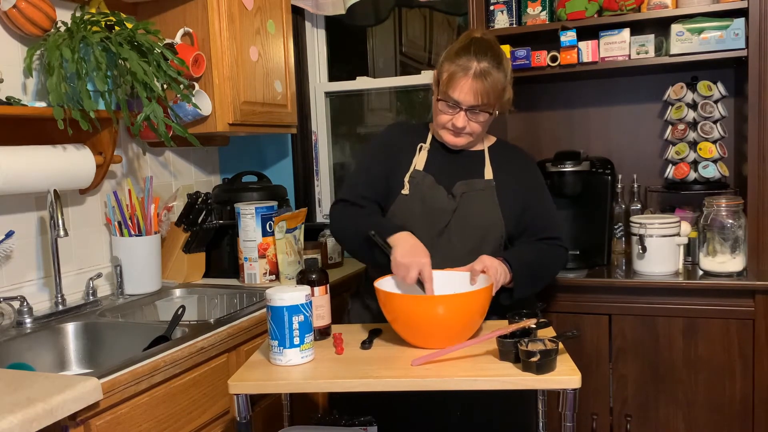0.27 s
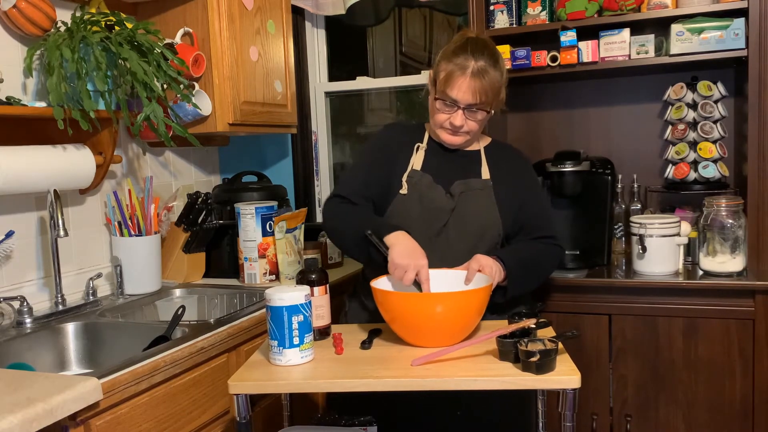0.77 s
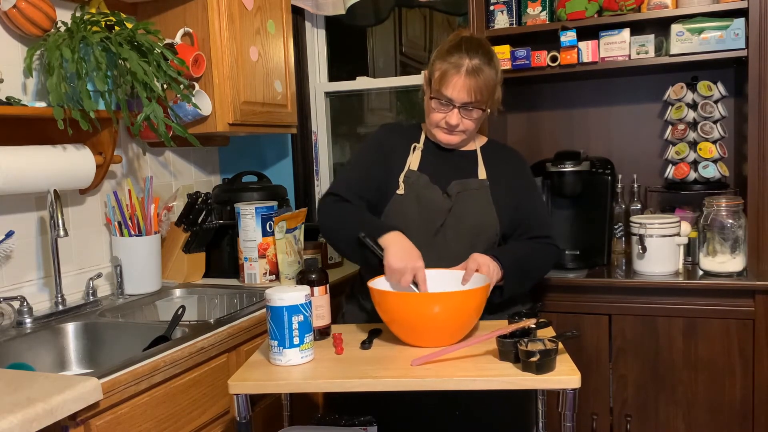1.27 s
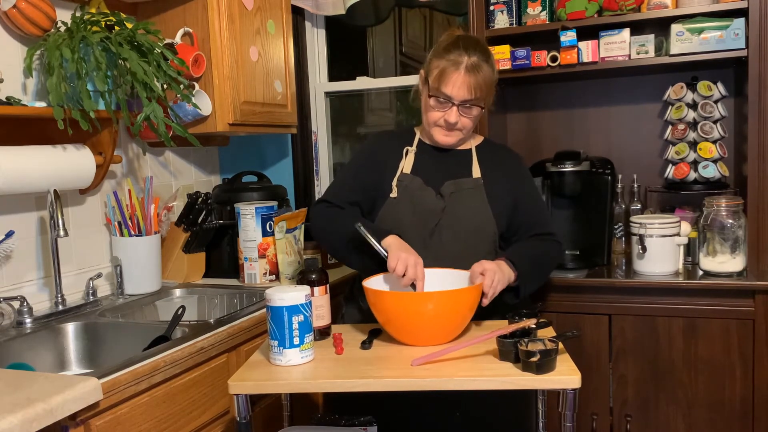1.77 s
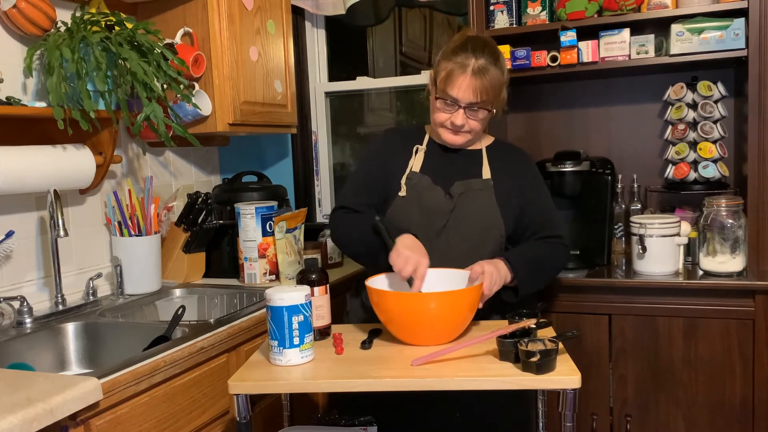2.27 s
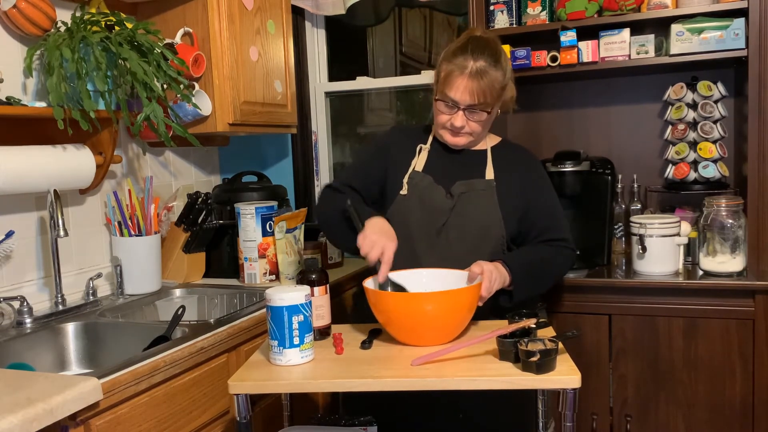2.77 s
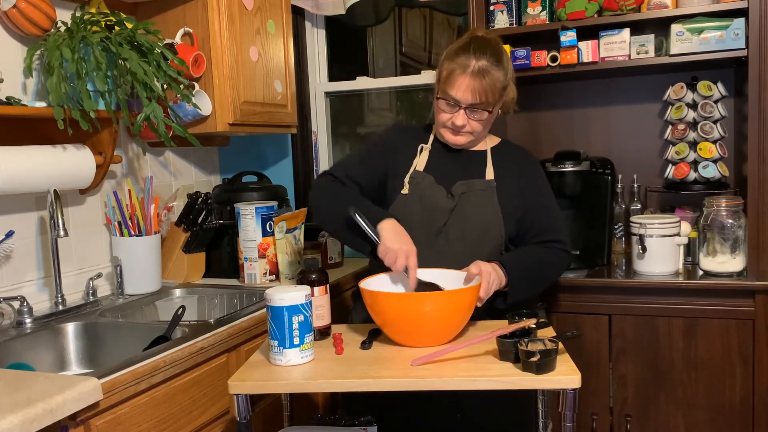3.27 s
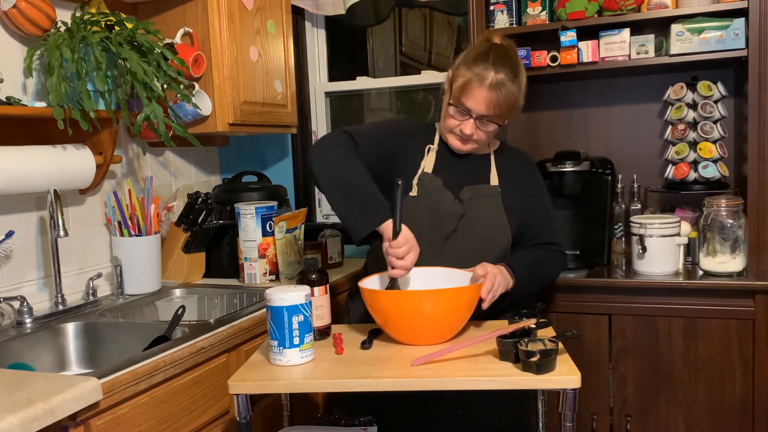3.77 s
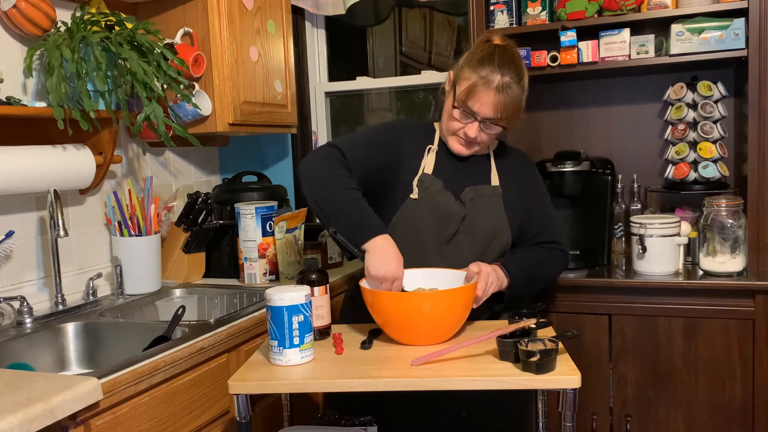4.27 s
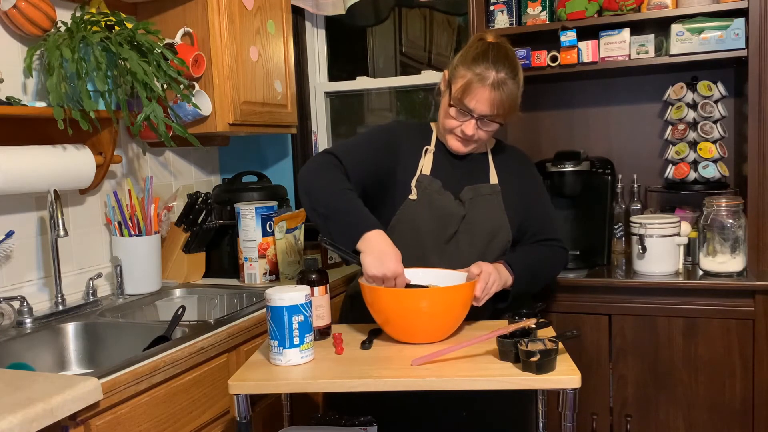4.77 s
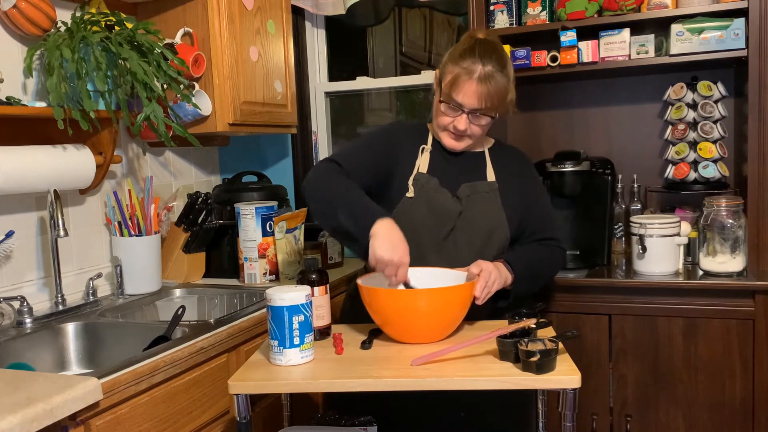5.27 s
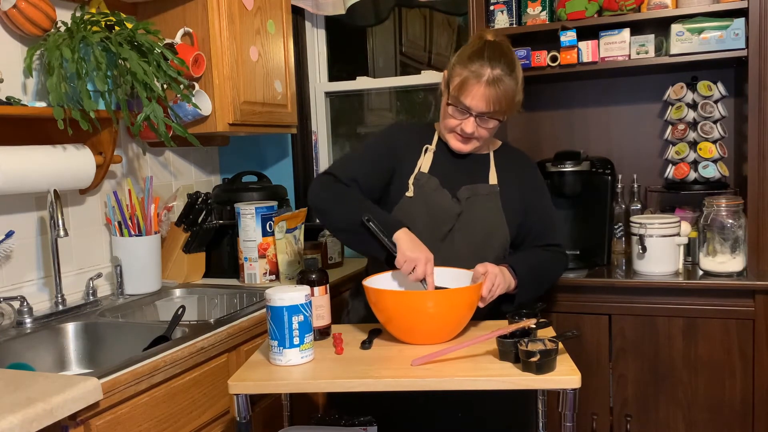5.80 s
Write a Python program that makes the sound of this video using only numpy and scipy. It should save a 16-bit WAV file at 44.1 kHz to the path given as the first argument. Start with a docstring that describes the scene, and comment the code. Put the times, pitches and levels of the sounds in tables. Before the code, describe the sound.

A plastic spoon stirs a thick, gritty mixture in a plastic bowl on a wooden cart, in a small reflective kitchen, heard in stereo from a short distance. From 0 s short strokes drag and rasp, with a light clack at 0.2 and a loud bright crack at 0.6 with a crunching lump. Pushes continue roughly two to five a second, strongest near 1.3, with small bowl knocks. At 2.0 comes the loudest hit: a hollow thud, brief plastic ring and low wooden shudder, with a duller clack. Stirring softens, then rasps brightly at 2.8-2.9. A clear clack at 3.6 leads into a strong gritty scrape at 3.8. From 4 to 5 strokes are quieter, with faint ticks; a dull tap at 5.1, a firm double bowl knock at 5.3, small clacks at 5.4, then light scraping to the end at about 6. A faint wavering low hum and soft hush remain beneath.

```python
"""Stirring a gritty mixture in a plastic bowl

A small kitchen in stereo: a plastic spoon works a thick, gritty mixture round a plastic bowl on a wooden cart.
Strokes drag, rasp and crunch as coloured trains of tiny slips; crushed lumps are short bursts of grains.
The spoon clacks on the wall and the bowl knocks and rocks on the cart: short pulses with decaying modes.
Behind them are a faint, wavering appliance hum and a noise hush; reflections place the bowl in the room.
"""
import sys
import numpy as np
from scipy import signal
from scipy.fft import rfft, irfft
from scipy.io import wavfile

SR = 44100
rng = np.random.default_rng(int(sys.argv[2]) if len(sys.argv) > 2 else 0)


def persist_wave(psi):
    """Save psi, clipped to +-1, as 16-bit WAV."""
    counts = np.round(np.clip(psi, -1, 1) * 32767).astype(np.int16)
    wavfile.write(sys.argv[1], SR, np.atleast_2d(counts).T)


N = 266143
TIME = np.arange(N) / SR


def from_db(db):
    """Decibels to gain."""
    return 10 ** (np.asarray(db) / 20)


def rms_one(x):
    """Scale to an rms of one."""
    return x / np.sqrt(np.mean(x ** 2) + 1e-20)


def peak_one(x):
    """Scale to a peak of one."""
    return x / np.abs(x).max()


def at_hz(points, hz, axis=1):
    """Read one column of a table on a log-frequency axis."""
    columns = np.transpose(points)
    return np.interp(np.log(np.maximum(hz, 1)), np.log(columns[0]), columns[axis])


def drift(rate_hz):
    """Slow random wandering with an rms of one: smoothed noise, computed at every 40th sample."""
    step = 40
    keep = np.exp(-2 * np.pi * rate_hz * step / SR)
    noise = rng.standard_normal(N // step + 2002)
    slow = signal.lfilter([1], [1, -2 * keep, keep * keep], noise)[2000:]
    return np.interp(np.arange(N) / step, np.arange(len(slow)), rms_one(slow))


def pulse_of(spectrum, size=16384):
    """The shortest causal pulse with this colour (minimum phase); unit energy."""
    log_gain = at_hz(spectrum, np.arange(size // 2 + 1) * SR / size) * np.log(10) / 20
    cepstrum = irfft(log_gain)
    # folding the cepstrum forward makes the pulse causal
    cepstrum[1:size // 2] *= 2
    cepstrum[size // 2 + 1:] = 0
    pulse = irfft(np.exp(rfft(cepstrum)))
    return pulse / np.linalg.norm(pulse)


def ring_of(modes, size=16384):
    """Decaying modes of alternating sign, struck a little differently every time; unit energy."""
    pitch_hz, level_db, t60_s = np.transpose(modes)[:, :, None]
    t = np.arange(size) / SR
    sign = (-1) ** np.arange(len(pitch_hz))[:, None]
    gain = sign * from_db(level_db + rng.standard_normal(pitch_hz.shape))
    decay = np.exp(-np.log(1000) * t / t60_s)
    ring = np.sum(gain * decay * np.sin(2 * np.pi * pitch_hz * t), axis=0)
    return ring / np.linalg.norm(ring)


def through(x, response):
    """Pass a sound through an impulse response."""
    return signal.oaconvolve(x, response)[:N]


def shelf(x, corner_hz, treble_db):
    """Raise or lower everything above a corner."""
    bass = signal.sosfilt(signal.butter(2, corner_hz, fs=SR, output="sos"), x)
    treble = signal.sosfilt(signal.butter(2, corner_hz, "high", fs=SR, output="sos"), x)
    # second-order halves meet in opposite phase at the corner, hence the minus
    return bass - from_db(treble_db) * treble


def add(track, s, db, blow):
    """Lay a blow into a track."""
    start = round(s * SR)
    track[start:start + len(blow)] += from_db(db) * blow[:N - start]


def cushioned(blow, contact_s):
    """A soft contact spreads the force over a short time."""
    keep = np.exp(-1 / (contact_s * SR))
    return signal.lfilter([1 - keep], [1, -keep], blow)


def chattering(blow, contact_s, bounce):
    """A rough contact is a quick flurry of touches: two allpass loops spread the blow and keep its colour."""
    for share in rng.uniform([.2, .6], [.5, 1]):
        loop = np.r_[1, np.zeros(int(share * contact_s * SR)), bounce]
        blow = signal.lfilter(loop[::-1], loop, blow)
    return blow


def grains(per_s, spread_db, clump_db):
    """Tiny slips of uneven size and random sign that come in clumps; rms one."""
    sizes = from_db(spread_db * np.minimum(rng.exponential(1, N), 4)) * rng.choice([-1, 1], N)
    happens = rng.random(N) < per_s / SR
    clumps = from_db(clump_db * drift(rate_hz=40))
    return rms_one(sizes * happens * clumps)


# colour of the empty-room hush: pitch_hz, level_db (per Hz)
HUSH_COLOUR = [(25, -9.5), (64, 6), (110, -19), (165, -4), (230, -13.5), (624, -18), (1230, -31.5),
               (1900, -30), (3720, -33.5), (8360, -33.5), (9700, -46), (11500, -30), (15500, -36.5)]
HUSH_DB = -67.5  # before the two shares of noise are mixed


def room_hush():
    """Coloured noise, partly shared by the two sides and partly their own."""
    colour = pulse_of(HUSH_COLOUR)
    shared, left, right = [through(rng.standard_normal(N), colour) for _ in range(3)]
    return from_db(HUSH_DB) * (0.46 * shared + 0.79 * np.array([left, right]))


# level about which the appliance hum wavers: time_s, level_db (rms)
HUM_LEVELS = [(0, -61), (3.7, -64), (4.3, -71.5), (5.0, -65.5), (5.8, -63.5)]
HUM_HZ = 59.4


def appliance_hum():
    """A single low tone whose level and phase waver at random."""
    level_db = np.interp(TIME, *np.transpose(HUM_LEVELS)) + 3.44 * drift(rate_hz=13)
    phase = 2 * np.pi * HUM_HZ * TIME + 1.0 * drift(rate_hz=3.8)
    return from_db(level_db) * np.sqrt(2) * np.sin(phase)


# kitchen walls and cupboards: pitch_hz, t60_s, reflections_db (against direct sound),
# likeness (of the two sides, -1 to 1)
KITCHEN_BANDS = [(78.5, 0.35, -0.5, 0.93), (308, 0.28, 1, 0.79), (673, 0.16, 0, 0.18),
                 (1192, 0.23, 8, 0.43), (2545, 0.25, 3.5, 0.033), (6300, 0.21, 12, 0.038),
                 (12630, 0.14, -3.5, 0.17)]


def reflections(gap_s, build_s, size=22050):
    """Stereo response of cupboards and walls: a short dense tail that dies band by band."""
    t, tail = np.arange(size) / SR, 0
    edges_hz = np.geomspace(40, 18000, 13)
    white = rng.standard_normal((2, 2, size))
    for k, (low, high) in enumerate(zip(edges_hz, edges_hz[1:])):
        centre_hz = np.sqrt(low * high)
        t60_s, wet_db, alike = [at_hz(KITCHEN_BANDS, centre_hz, axis=column) for column in range(1, 4)]
        # neighbouring bands use different noise
        band = signal.sosfilt(signal.butter(2, [low, high], "band", fs=SR, output="sos"), white[k % 2])
        onset = 1 - np.exp(-np.maximum(t - gap_s, 0) / build_s)
        band = band * np.exp(-np.log(1000) * t / t60_s) * onset
        band = band / np.linalg.norm(band, axis=1, keepdims=True)
        mid, side = from_db(wet_db) * band * np.sqrt((high - low) / SR)
        tail = tail + np.sqrt(1 + alike) * mid + np.sqrt(1 - alike) * side * [[1], [-1]]
    return tail


STIR_RATE_HZ = 2.7     # the arm's round changes the paths to the walls
LEFT_LAG_S = 0.000078


def kitchen(x):
    """The reflections shift as the arm goes round; everything reaches the right side first."""
    sides, turn = np.array([x, x]), 2 * np.pi * STIR_RATE_HZ * TIME
    # three sets of reflections take turns; the squares of their shares add to one
    shares = (np.cos(turn), np.sin(turn) * np.cos(turn / 2), np.sin(turn) * np.sin(turn / 2))
    for share in shares:
        sides = sides + [through(share * x, side) for side in reflections(gap_s=0.0017, build_s=0.00059)]
    # windowed sinc: a delay of a fraction of a sample
    taps = np.arange(-16, 17)
    late = np.sinc(taps - LEFT_LAG_S * SR) * np.hanning(len(taps))
    return np.array([np.convolve(sides[0], late, "same"), sides[1]])


# lumps crushed under the spoon: start_s, level_db, treble_db (change above the corner)
LUMPS = [(0.18, -59.5, 10.5), (0.613, -41, 3.5), (1.092, -56, -5), (2.031, -32, -7), (3.599, -43, -25),
         (5.413, -49, -0.5)]
# colour of a crushed lump: pitch_hz, level_db (per Hz)
LUMP_COLOUR = [(200, -3), (1200, -10.5), (2100, -0.5), (3600, -8), (5500, -17), (7000, -15.5),
               (9800, -20.5), (13000, -5), (16000, -12.5)]
CRUSH_S = 0.029  # time scale of the burst
# a lump starts to crumble, softly and dully, just before it breaks: lead, changes of level and treble
CRUMBLE_LEAD_S, CRUMBLE_DB, CRUMBLE_TREBLE_DB = 0.015, -9, -25.5


def crushed_lumps(size=8820):
    """A lump crumbles, then gives way in a burst of grains that swells quickly and dies."""
    out, age = np.zeros(N), np.arange(size) / SR / CRUSH_S
    crumbs = through(grains(per_s=2500, spread_db=3.5, clump_db=1.5), pulse_of(LUMP_COLOUR))
    force = (1 - np.exp(-7 * age)) * np.exp(-age ** 2)
    crumbles = [(s - CRUMBLE_LEAD_S, db + CRUMBLE_DB, treble_db + CRUMBLE_TREBLE_DB)
                for s, db, treble_db in LUMPS]
    for s, db, treble_db in list(LUMPS) + crumbles:
        span = round(s * SR) + np.arange(size)
        burst = rms_one(force * crumbs[span]) * np.sqrt(np.mean(force ** 2))
        out[span] += from_db(db) * shelf(burst, corner_hz=5450, treble_db=treble_db)
    return out


# bowl knocks on the cart: start_s, level_db, hardness_db (treble change), cart_db (shudder against level)
BOWL_KNOCKS = [(0.371, -36.5, -11, -9), (0.912, -43.5, -16, -9.5), (1.2, -42.5, 6, -15),
               (1.304, -46, 7, -26), (1.423, -37, -34, -9), (1.787, -43.5, -9, -27), (2.029, -10, 0.5, -16),
               (3.473, -47, -2, -16), (4.213, -40, -16, -13), (4.963, -42, -30, -8.5),
               (5.32, -28.5, -2.5, -20), (5.349, -31, -28, -10), (5.644, -45, -32, -9.5)]
# colour of the thud: pitch_hz, level_db (per Hz)
THUD_COLOUR = [(40, -23.5), (80, -14.5), (220, 4), (420, 7.5), (700, 2.5), (1000, -8), (1500, -9),
               (2400, -8), (5000, -22), (15000, -42)]
# modes of the plastic bowl: pitch_hz, level_db, t60_s
BOWL_MODES = [(298.2, -2, 0.26), (388, -9.5, 0.054), (473, -5.5, 0.076), (593.7, 5.5, 0.078),
              (630, 4.5, 0.11), (685.5, 7.5, 0.092), (842, -16, 0.15), (1030, -5.5, 0.072),
              (1287, -22.5, 0.28), (1721, -3.5, 0.066), (2180, -7.5, 0.059), (2430, -7.5, 0.069),
              (3000, -9, 0.035)]
# modes of the wooden cart: pitch_hz, level_db, t60_s
CART_MODES = [(44.1, -6.5, .3), (77.9, -1.5, 0.42), (101, 0, 0.13), (116.3, -2.5, 0.2), (163.9, 3, 0.23),
              (241, -4.5, 0.035), (301.9, -2, 0.34)]
CART_LAG_S = 0.00639
# the bowl rocks back onto its foot, softer and duller: delay, changes of level and hardness
ROCK_BACK_S, ROCK_BACK_DB, ROCK_BACK_HARD_DB = .043, -19, -10.5


def bowl_knocks():
    """The bowl's foot hits the cart and rocks back: a dull thud, the bowl's ring, a slow shudder of the cart."""
    out, thud = np.zeros(N), pulse_of(THUD_COLOUR)
    rocks = [(s + ROCK_BACK_S, db + ROCK_BACK_DB, hard_db + ROCK_BACK_HARD_DB, cart_db)
             for s, db, hard_db, cart_db in BOWL_KNOCKS]
    for s, db, hard_db, cart_db in list(BOWL_KNOCKS) + rocks:
        blow = cushioned(thud, contact_s=.00007) + from_db(0.5) * ring_of(BOWL_MODES)
        blow = peak_one(shelf(blow, corner_hz=1267, treble_db=hard_db))
        add(out, s, db, from_db(-1.5) * chattering(blow, contact_s=0.0016, bounce=0.48))
        # the heavy cart top follows a moment later
        shudder = from_db(4) * cushioned(thud, contact_s=0.0015)
        shudder = shudder + cushioned(ring_of(CART_MODES), contact_s=0.0011)
        add(out, s + CART_LAG_S, db + cart_db, from_db(4.5) * peak_one(shudder))
    return out


# spoon clacks on the bowl wall: start_s, level_db, sharpness_db (treble change)
SPOON_CLACKS = [(0.184, -24.5, 16), (0.615, -7.5, 16), (0.645, -18.5, 3.5), (0.749, -38, -30),
                (1.097, -30, 22), (2.038, -20, -13), (2.4804, -48, -42), (2.7494, -34.5, 14),
                (3.589, -28, 14), (3.6027, -14.5, 5.5), (4.123, -39.5, 14), (4.3017, -45, -4),
                (4.565, -48.5, -34), (4.6246, -38.5, 22.5), (4.9918, -42.5, -33), (5.07, -36.5, 14),
                (5.14, -26.5, -48), (5.398, -26.5, 26), (5.43, -28, -18)]
# colour of the crack: pitch_hz, level_db (per Hz)
CRACK_COLOUR = [(200, -45), (1200, -8.5), (2200, -4.5), (4000, -4), (7000, -3), (9800, -13.5), (13000, -7),
                (16000, -0.5)]
# modes of the spoon against the wall: pitch_hz, level_db, t60_s
SPOON_MODES = [(640, -11.5, 0.021), (1032, -20, 0.014), (1700, -1.5, 0.0099), (1925, 6, 0.0053),
               (2380, 7.5, 0.003), (3047, -2, 0.0045), (4090, -3, 0.0012)]


def spoon_clacks():
    """Plastic on gritty plastic: a crack and a very short ring."""
    out, crack = np.zeros(N), pulse_of(CRACK_COLOUR)
    for s, db, sharp_db in SPOON_CLACKS:
        blow = shelf(crack + from_db(8) * ring_of(SPOON_MODES), corner_hz=5220, treble_db=sharp_db)
        add(out, s, db, chattering(peak_one(blow), contact_s=0.00044, bounce=0.46))
    return from_db(-1.5) * out


# pushes of the spoon through the mixture: hardest_s, length_s, drag_db (the mass), rasp_db (on the wall),
# grit_db (crunch); levels come before the mix of the strokes
SPOON_PUSHES = [(0.0, 0.13, -51.5, -54, -64), (0.225, 0.24, -54.5, -59, -67), (0.405, 0.3, -56, -55.5, -67),
                (0.726, .12, -58, -52.5, -73), (0.88, 0.33, -57.5, -63, -73.5),
                (1.122, .13, -53.5, -57, -64), (1.303, 0.2, -48, -57, -65), (1.507, 0.17, -62, -75, -90),
                (1.83, 0.24, -58.5, -67, -76.5), (2.26, 0.3, -60, -69.5, -84.5),
                (2.634, 0.17, -65, -71.5, -96), (2.817, 0.1, -51.5, -56.5, -65),
                (2.914, 0.17, -52, -48.5, -54), (3.114, 0.92, -70, -73, -77.5),
                (3.554, 0.18, -56, -87, -95), (3.827, 0.19, -49, -49, -52.5),
                (3.968, 0.33, -61.5, -59, -65.5), (4.249, 0.51, -68, -64, -82),
                (4.545, 0.21, -92, -68, -82), (5.13, 0.35, -72, -63, -75.5), (5.513, 0.2, -66, -59, -73),
                (5.855, 0.4, -72.5, -68.5, -83), (6.02, 0.36, -71, -60.5, -73.5)]
# share of a push's length spent swelling, level lost at either end, roundness of its top
SWELL_SHARE, PUSH_EDGE_DB, PUSH_ROUNDNESS = 0.53, 13.5, 1.27
# the spoon's steady creep through the mixture, before the mix of the strokes
CREEP_DRAG_DB, CREEP_RASP_DB, CREEP_GRIT_DB = -80.5, -85, -86


def effort():
    """Strength of drag, rasp and grit over time: each push swells and eases off above a steady creep."""
    power = from_db([[CREEP_DRAG_DB], [CREEP_RASP_DB], [CREEP_GRIT_DB]]) ** 2 * np.ones(N)
    for s, length, *levels_db in SPOON_PUSHES:
        near = np.abs(TIME - s) < 2 * length
        before = (s - TIME[near]) / SWELL_SHARE
        after = (TIME[near] - s) / (1 - SWELL_SHARE)
        away = np.maximum(before, after) / length  # one at either end of the push
        push_db = np.array(levels_db)[:, None] - PUSH_EDGE_DB * away ** PUSH_ROUNDNESS
        power[:, near] += from_db(push_db) ** 2
    return np.sqrt(power)


# colour of the dragged mass: pitch_hz, level_db (per Hz)
DRAG_COLOUR = [(50, -40.5), (100, -3.5), (165, 2.5), (280, -8), (480, 0.5), (560, -3), (660, 7), (820, -8),
               (1200, -13.5), (2000, -12), (6000, -44.5)]
# colour of the rasp on the wall: pitch_hz, level_db (per Hz)
RASP_COLOUR = [(400, -5), (1000, -8.5), (1400, -2), (1950, 3.5), (2500, 1.5), (3300, -3.5), (5000, -12),
               (9000, -33.5)]
# colour of the crunching grit: pitch_hz, level_db (per Hz)
GRIT_COLOUR = [(1000, -12.5), (3500, -44.5), (5000, -4), (6800, 1), (8200, -2.5), (9800, -14.5),
               (11500, -0.5), (13500, 3), (16000, -5)]
# small sticky ticks as the mixture lets go of the wall: mean rate, gain on the rasp's strength
TICKS_PER_S, TICKS_DB = 50, -12


def strokes():
    """The sticky mass tugs at bowl and cart, the spoon rasps and ticks on the wall, grit crunches between."""
    drag, rasp, grit = effort()
    bowl = pulse_of(DRAG_COLOUR) + from_db(-14) * ring_of(BOWL_MODES)
    pulls = drag * grains(per_s=900, spread_db=2.8, clump_db=2.2)
    tugs = from_db(-1.5) * through(pulls, bowl) + from_db(-17) * through(pulls, ring_of(CART_MODES))
    slips = through(rasp * grains(per_s=800, spread_db=4.5, clump_db=2.2), pulse_of(RASP_COLOUR))
    crunch = through(grit * grains(per_s=2100, spread_db=2, clump_db=3.0), pulse_of(GRIT_COLOUR))
    ticks = through(rasp * grains(per_s=TICKS_PER_S, spread_db=2, clump_db=4.0), ring_of(SPOON_MODES))
    return tugs + from_db(-6.0) * slips + from_db(-5.0) * crunch + from_db(TICKS_DB) * ticks


def scene():
    """All the sounds of the bowl share one place in the kitchen, in front of hum and hush."""
    bowl = crushed_lumps() + bowl_knocks() + spoon_clacks() + strokes()
    return room_hush() + appliance_hum() + kitchen(bowl)


def record(dry):
    """The microphone drops the deepest bass; the top is cut steeply."""
    lean = signal.sosfilt(signal.butter(2, 38, "high", fs=SR, output="sos"), dry)
    top_cut = signal.ellip(10, .1, 80, 15900, fs=SR, output="sos")
    return signal.sosfilt(top_cut, lean)


dry = scene()
out = record(dry)
persist_wave(out)
```